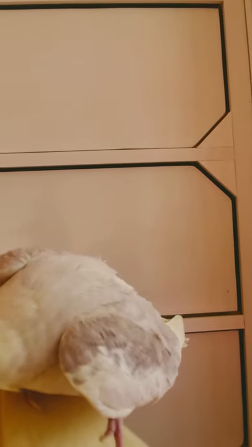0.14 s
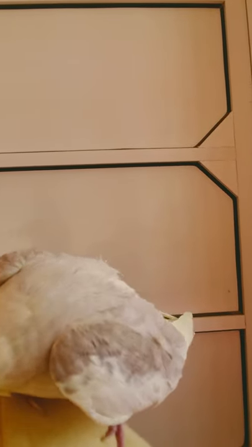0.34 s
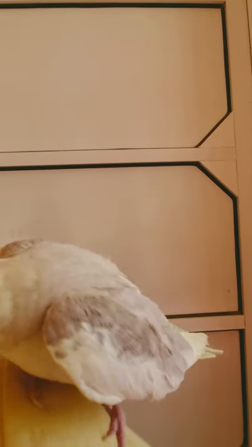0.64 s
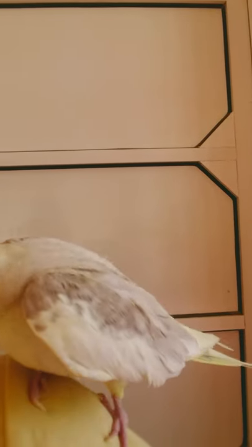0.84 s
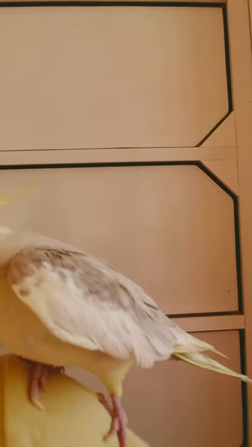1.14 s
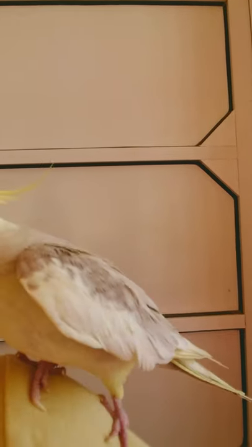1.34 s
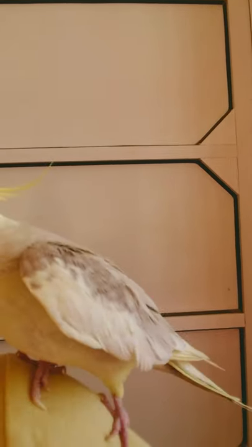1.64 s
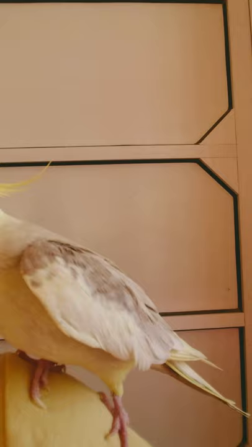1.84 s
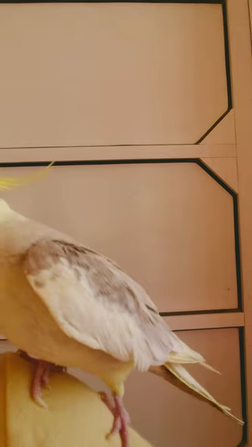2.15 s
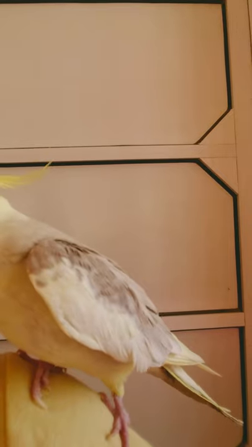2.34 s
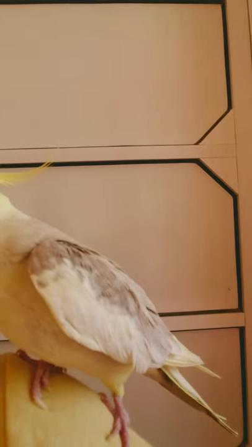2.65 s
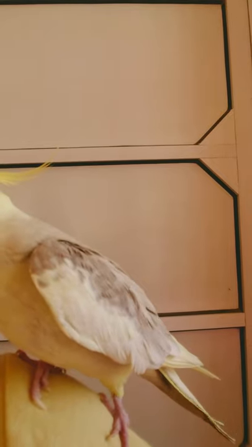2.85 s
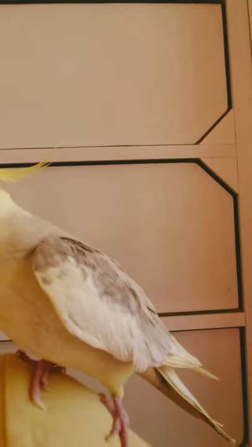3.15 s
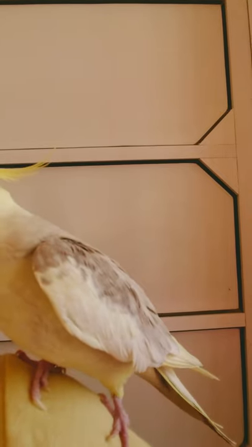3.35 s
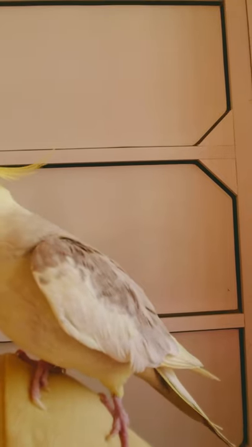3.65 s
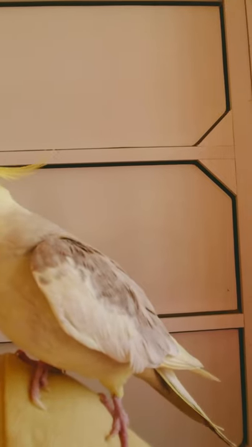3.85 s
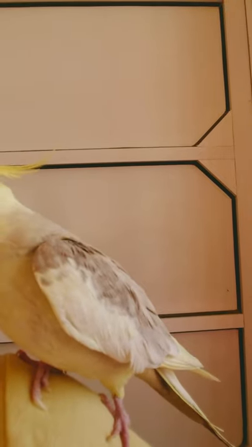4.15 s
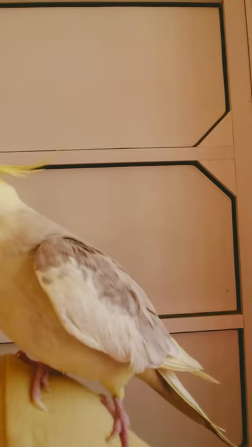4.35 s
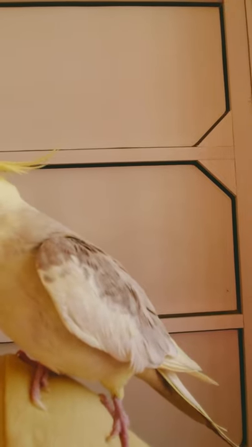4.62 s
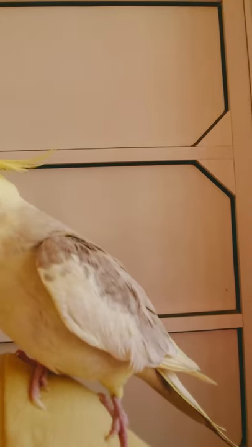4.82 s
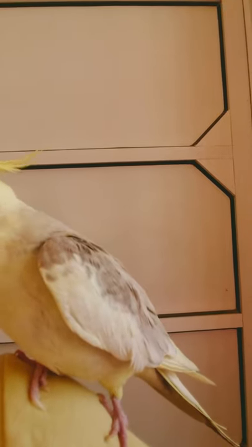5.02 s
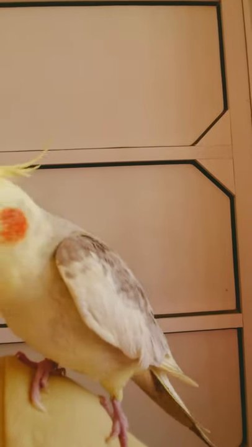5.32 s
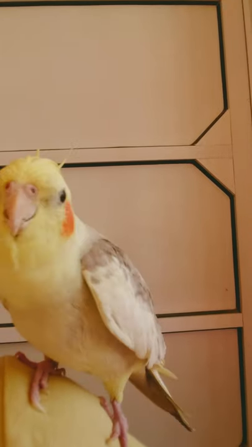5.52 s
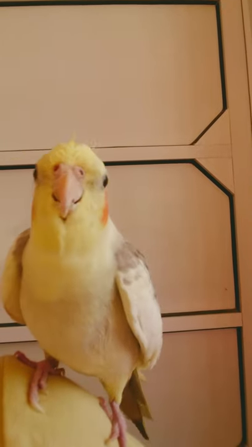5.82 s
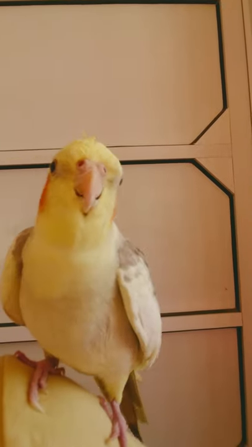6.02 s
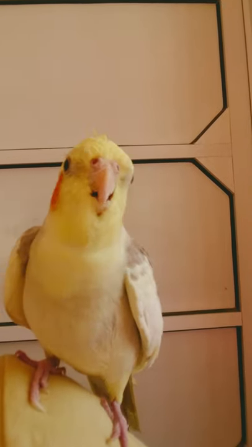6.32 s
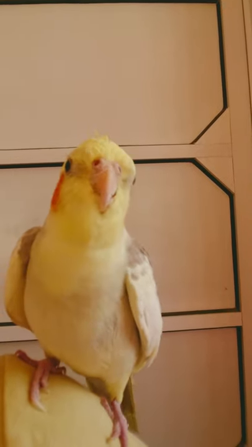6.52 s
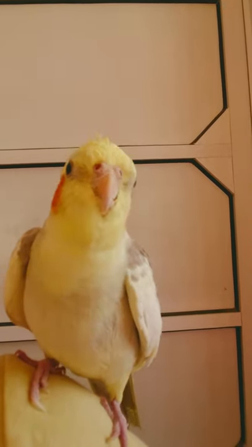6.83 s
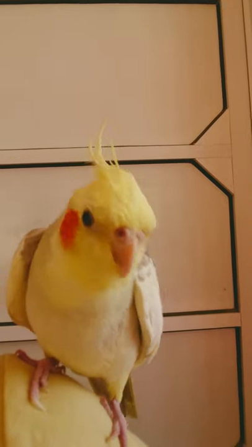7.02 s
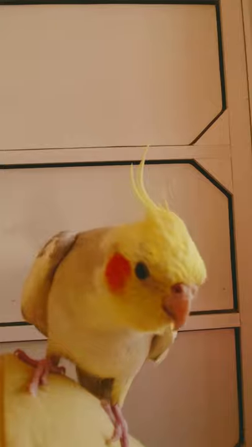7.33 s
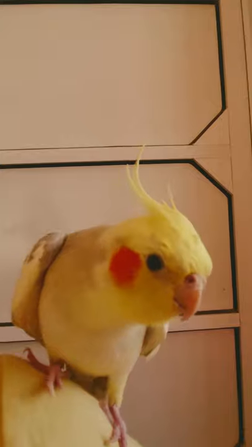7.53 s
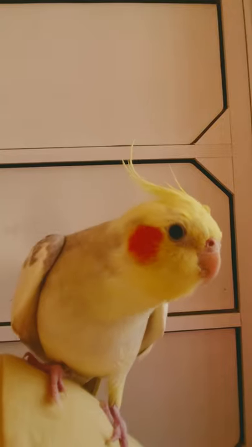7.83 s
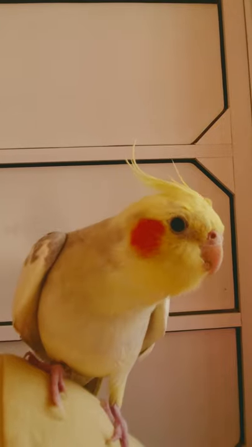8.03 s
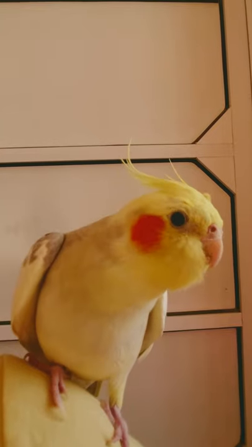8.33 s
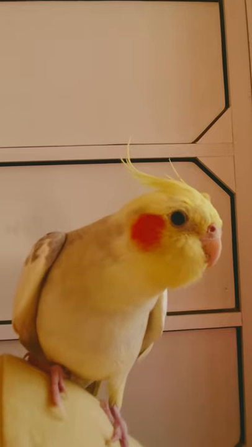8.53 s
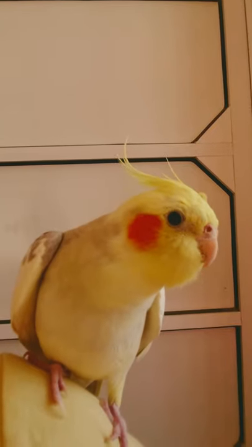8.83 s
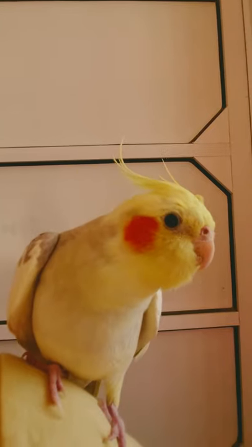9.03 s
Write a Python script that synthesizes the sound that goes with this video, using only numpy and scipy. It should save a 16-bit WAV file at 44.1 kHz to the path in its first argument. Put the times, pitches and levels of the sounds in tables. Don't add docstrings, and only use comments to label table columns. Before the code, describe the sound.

A cockatiel close by fires off a steady run of falling chirps, pauses, then gives sliding whistles, a loud shriek and paired calls over faint hum.

```python
import sys
import numpy as np
from scipy import signal
from scipy.fft import rfft, irfft, next_fast_len
from scipy.io import wavfile
from scipy.ndimage import uniform_filter1d, map_coordinates

SR = 44100
rng = np.random.default_rng(int(sys.argv[2]) if len(sys.argv) > 2 else 0)


def put_to_file(sound):
    columns = np.atleast_2d(sound).T
    safe = np.clip(columns, -1, 1)
    whole_steps = np.round(safe * 32767)
    wavfile.write(sys.argv[1], SR, whole_steps.astype(np.int16))


def elevation(decibels):
    levels = np.asarray(decibels, float)
    return 10 ** (levels / 20)


N = 404397


def curve(table, at, column=1):
    table = np.array(table, float)
    return np.interp(np.log(np.maximum(at, 1)), np.log(table[:, 0]), table[:, column])


def walk(rate_hz, size=N):
    span = int(SR / rate_hz)
    x = rng.standard_normal(size + 2 * span)
    x = uniform_filter1d(uniform_filter1d(x, span), span)[span:-span]
    return x / x.std()


def ring(x, hz, width_hz):
    return signal.lfilter(*signal.iirpeak(hz, hz / width_hz, SR), x)


def add(out, start_s, x):
    i = int(start_s * SR)
    out[i:i + len(x)] += x[:N - i]


def clock(length_s):
    return np.arange(0, length_s, 1 / SR)


def whistle(hz, db, second_db, third_db=-42, slope_db=-3.0, share=0.52, effort=0.1):
    size = len(hz)
    t = np.arange(size) / SR
    jitter, shimmer_db = 0.0035, 1.17
    phase = 2 * np.pi * np.cumsum(hz * (1 + jitter * walk(270, size))) / SR
    x = np.sin(phase) + elevation(second_db + 2.5 * walk(110, size)) * np.sin(2 * phase + 1)
    for k in range(3, 12):
        over_db = third_db + slope_db * (k - 3) + share * (second_db + 29) + effort * (db - db.max())
        level = elevation(over_db + 3.5 * walk(110, size)) * (k * hz < 17000)
        x = x + level * np.sin(k * phase + k * k + .045 * k * walk(900, size))
    x = x + elevation(-56.5) * np.sin(phase) * walk(2500, size)
    edge = np.clip(np.minimum(t / .003, (t[-1] - t) / .005), 0, 1)
    return np.sqrt(2) * x * elevation(db + shimmer_db * walk(120, size)) * np.sin(np.pi / 2 * edge) ** 2


def rasp(length_s, db, hz, width_hz, breath):
    size = int(length_s * SR)
    rate_hz, bright_db = 330, -27
    slaps = (rng.random(size) < rate_hz / SR) * elevation(1.7 * rng.standard_normal(size))
    slaps = slaps * np.sqrt(SR / rate_hz)
    swell = np.sin(np.pi * np.arange(size) / size) ** 0.55
    drive = np.pad((slaps + breath * rng.standard_normal(size)) * swell, (0, 200))
    throat = ring(ring(drive, hz, width_hz), hz, 1.5 * width_hz)
    x = throat + elevation(bright_db) * ring(ring(drive, 5300, 6000), 4900, 9000)
    x = signal.sosfilt(signal.butter(2, 3200, fs=SR, output="sos"), x)
    return x * elevation(db) / x.std()


# start_s, length_s, start_hz, bend (power of the fall), level_db
CHIRPS = [(1.104, .063, 2530, 5.0, -21.5), (1.265, 0.068, 2988, 3.0, -17.5), (1.424, 0.062, 2943, 3.0, -16),
          (1.575, 0.069, 3058, 4.0, -17.5), (1.747, 0.072, 3043, 3.1, -15.5),
          (1.925, .079, 2903, 3.8, -16.5), (2.102, 0.073, 2970, 2.8, -14.5),
          (2.28, 0.072, 2876, 3.5, -16.5), (2.458, 0.077, 2930, 4.0, -16), (2.631, 0.069, 2992, 3.2, -16),
          (2.803, 0.076, 2922, 3.6, -16), (2.985, 0.071, 3004, 3.7, -15.5), (3.168, .077, 3030, 3.4, -15),
          (3.359, 0.078, 3024, 3.0, -14.5), (3.538, 0.087, 2755, 3.5, -16.5),
          (3.724, 0.088, 2727, 4.5, -17), (3.935, 0.078, 2978, 5.1, -17)]
# time_s, pitch_hz
CHIRP_PLATEAU = [(1.1, 2779), (1.27, 2853), (1.6, 2916), (2.3, 2848), (3.2, 2908), (3.72, 2867),
                 (3.94, 2777)]


def chirps(out):
    settle_s, end_hz = .01, 1347
    for s, length, start_hz, bend, db in CHIRPS:
        t = np.arange(int(length * SR)) / SR
        fall = (t / length) ** bend
        top_hz = np.interp(s, *np.transpose(CHIRP_PLATEAU))
        hz = top_hz + (start_hz - top_hz) * np.exp(-t / settle_s) - (top_hz - end_hz) * fall
        swell_db = -3 * np.exp(-t / 0.014) - 9 * np.exp(-t / .0025) - 34 * fall ** 1.217
        add(out, s, whistle(hz, db + swell_db, -30 - 7 * fall, -35, -1.0, effort=0.36))
        add(out, s + length - .016, rasp(.016, db - 29, 1300, 1000, 0.6))


# third_db (below the first), slope_db per overtone,
# share that follows the second, share that follows effort
TONE = dict(low=(-31.5, -6.5, 0.18, .1), arch=(-34.5, -1.5, 0.5, 0.1), scoop=(-36.5, -1, 0.3, 0.24),
        drop=(-38, -3.5, 1.1, 0.44), slide=(-42.5, -2.8, 1.2, .2), shriek=(-36.5, -4.5, 0.46, -0.36))
# start_s, length_s, pitch_hz, level_db, beak_opening_db
LOWS = [
    (.955, .095, 1297, -37.5, -5),
    (4.165, 0.1034, 1293, -33.5, 3),
]


def lows():
    for s, length, hz, db, beak_db in LOWS:
        t = clock(length)
        settle = np.exp(-t / 0.0067)
        waver_hz = -22 * np.sin(2 * np.pi * 13 * t)
        yield s + t, hz + 80 * settle + waver_hz, db + 1 * settle, beak_db, TONE["low"]


# start_s, length_s, top_hz, top_at (share of the length), end_hz
ARCHES = [(5.565, .078, 1435, 0.83, 1390), (5.936, .065, 2259, .5, 2150), (6.073, .093, 1710, .52, 1245)]
ARCH_DB = [-31, -20, -21]


def arches():
    start_share = .91
    rise_db, fall_db = 89.5, 55.5
    for (s, length, top_hz, top_at, end_hz), db in zip(ARCHES, ARCH_DB):
        t = clock(length)
        way = t / length - top_at
        rise = np.sin(np.pi / 2 * np.minimum(way, 0) / top_at) ** 2
        fall = (np.maximum(way, 0) / (1 - top_at)) ** 1.6
        hz = top_hz * (1 - (1 - start_share) * rise) - (top_hz - end_hz) * fall
        push_db = np.where(way < 0, rise_db, fall_db) * np.log(hz / top_hz)
        yield s + t, hz, db + push_db, -5, TONE["arch"]


# start_s, length_s, top_hz, level_db, sag_db per s after the top
SCOOPS = [(7.321, .073, 2640, -20, 330), (7.694, .065, 2578, -16, 30), (8.081, .069, 2634, -16, 40.5)]


def scoops():
    from_hz, rise_s, arch_hz, soft_db, fade_s = 1430, .031, 130, -29, 0.0096
    for s, length, top_hz, db, sag_db in SCOOPS:
        t = clock(length)
        rise = np.minimum(t / rise_s, 1)
        fade = np.maximum(1 - (length - t) / fade_s, 0)
        hz = from_hz + (top_hz - from_hz) * np.sin(np.pi / 2 * rise ** 1.6) ** 2
        hz = hz - arch_hz * ((t - .048) / .022) ** 2 * (rise == 1)
        swell_db = soft_db * (1 - np.minimum(t / .045, 1)) ** 1.7
        level_db = db + swell_db - 18 * fade - sag_db * np.maximum(t - .042, 0)
        yield s + t, hz, level_db, -2.5, TONE["scoop"]


# start_s, length_s, start_hz, end_hz, level_db
DROPS = [(7.451, .033, 2272, 2010, -34.5), (7.83, 0.035, 2198, 1952, -32), (8.221, .034, 2231, 2016, -30)]


def drops():
    for s, length, start_hz, end_hz, db in DROPS:
        t = clock(length)
        way = t / length
        hz = start_hz + (end_hz - start_hz) * way ** 1.5
        yield s + t, hz, db - 4 * (1 - way) ** 3, -2.5, TONE["drop"]


# time_s, pitch_hz, level_db
SLIDES = [
    [(5.18, 2330, -44.5), (5.214, 1839, -38.5), (5.236, 2104, -30), (5.258, 2148, -22.5),
     (5.272, 2030, -29.5), (5.283, 1420, -35.5), (5.292, 1400, -42.5)],
    [(5.298, 2113, -45), (5.307, 2340, -29.5), (5.322, 2799, -20), (5.358, 3020, -19), (5.372, 3266, -14),
     (5.392, 3356, -17.5)],
    [(5.694, 2123, -30), (5.701, 2088, -18.5), (5.708, 2570, -15.5), (5.722, 2698, -15.5),
     (5.762, 2761, -24), (5.79, 3035, -15), (5.817, 2874, -20)],
]
# time_s, pitch_hz, level_db, beak_opening_db (on the second overtone)
SHRIEK = [(6.293, 1367, -34, 9), (6.33, 1539, -27.5, 15.5), (6.352, 1829, -19.5, 25),
          (6.378, 2134, -19.5, 19.5), (6.394, 2707, -13.5, 3.5), (6.41, 3041, -13, 0), (6.45, 2882, -11, 0),
          (6.476, 2450, -24.5, -0.5), (6.489, 1523, -37, -9)]


def slides():
    for rows, tone in [(slide, "slide") for slide in SLIDES] + [(SHRIEK, "shriek")]:
        s, hz, db, *beak_db = np.transpose(rows)
        t = np.arange(s[0], s[-1], 1 / SR)
        smooth = lambda c: uniform_filter1d(np.interp(t, s, c), size=200, mode="nearest")
        yield t, smooth(hz), smooth(db), sum(smooth(c) for c in beak_db), TONE[tone]


# start_s, end_s, rate_hz, depth_hz, slip_db (dip at each slip)
WARBLE = (6.322, 6.401, 78.5, 190, 9)
# width_s, drop (share of pitch), dip_db
BREAK = (.0022, .05, 5)
# pitch_hz, level_db (below the first)
SECOND = [(1300, -13), (1700, -16), (2100, -22), (2600, -26), (3300, -32)]


def note_voice(t, hz, db, beak_db, tone):
    start, end, rate_hz, depth_hz, slip_db = WARBLE
    shake = np.clip((t - start) / (end - start), 0, 1) * np.clip((end - t) / 0.0052, 0, 1)
    turn = 2 * np.pi * rate_hz * (t - start)
    sway = -np.cos(turn - np.pi / 4) - .35 * np.sin(2 * turn)
    width, drop, dip_db = BREAK
    gap = sum(np.exp(-((t - tick[0]) / width) ** 2) for tick in TICKS)
    level_db = db - slip_db * shake * np.maximum(np.cos(turn), 0) - dip_db * gap
    pitch_hz = (hz + depth_hz * shake * sway) * (1 - drop * gap)
    return whistle(pitch_hz, level_db, curve(SECOND, hz) + beak_db, *tone)


# (throat_hz, throat_width_hz, breath against slaps),
# then rows of start_s, length_s, level_db
RASPS = [
    ((1040, 1100, 3.0), [(.955, .03, -61), (4.169, 0.11, -56.5), (5.277, 0.01343, -49.5), (5.563, 0.016, -50.5), (5.632, .022, -50.5), (5.936, 0.0093, -56.5), (6.077, .02, -49), (6.299, .017, -55.5)]),
    ((1390, 880, 1.6), [(3.6, .03, -42), (3.8, .029, -42.5), (5.181, .03, -47)]),
    ((2340, 470, 4.0), [(5.179, .018, -48.5), (5.192, 0.013, -49.5)]),
    ((1590, 1320, 1.5), [(7.323, 0.03, -46), (7.691, .023, -39.5), (8.083, 0.021, -39)]),
    ((1600, 1120, 1), [(7.477, 0.049, -46.5), (7.858, .05, -40.5), (8.248, .07, -38)]),
]


def rasps(out):
    for throat, rows in RASPS:
        for s, length, db in rows:
            add(out, s, rasp(length, db, *throat))


# start_s, peak_db, ring_hz
TICKS = [(1.724, -44, 3700), (1.874, -51.5, 4040), (2.062, -52, 5000), (3.338, -47.5, 5500),
         (4.722, -55.5, 4440), (4.809, -57, 2300), (5.311, -43.5, 1202), (5.334, -43.5, 4100),
         (5.357, -38, 1490), (5.388, -33, 1605), (5.567, -44, 900), (5.643, -48, 1504),
         (5.734, -36.5, 1489), (5.757, -46.5, 1530), (5.781, -33.5, 1510), (5.81, -39.5, 1560),
         (5.938, -38.5, 1300), (6.001, -48.5, 1318), (6.076, -37.5, 1000), (6.167, -33, 1200),
         (6.473, -29, 1416), (7.314, -38.5, 1580), (7.39, -36, 1325), (7.684, -34.5, 1460),
         (7.76, -31, 1324), (8.075, -35, 1760), (8.151, -30, 1427), (9.035, -55, 399)]


def ticks(out):
    for s, db, hz in TICKS:
        age = np.arange(260)
        snap = rng.standard_normal(len(age)) * np.exp(-age / 40) * np.minimum(age / 12, 1)
        tick = ring(ring(snap, hz, .8 * hz), hz, 1.7 * hz) + .012 * ring(snap, 4500, 2000)
        add(out, s, elevation(db) * tick / np.abs(tick).max())


def bird():
    out = np.zeros(N)
    chirps(out)
    for kind in (lows, arches, scoops, drops, slides):
        for note in kind():
            add(out, note[0][0], note_voice(*note))
    rasps(out)
    ticks(out)
    return out


# delay_ms, level_db
ECHOES = [
    [(1.5, -23.5), (4, -20), (8.8, -10.5), (11.2, -16.5), (22, -16)],
    [(1.5, -21.5), (3.9, -19.5), (16, -15.5), (22.8, -16.5), (28, -19)],
]
# centre_hz, t60_s
ROOM = [(500, .8), (1400, 0.53), (2800, 0.51), (6000, 0.42), (12000, 0.22)]


def walls():
    t = np.arange(int(.9 * SR)) / SR
    edges_hz = [100, 900, 2000, 4100, 8500, 20000]
    tail = 0
    for (_, t60), lo, hi in zip(ROOM, edges_hz, edges_hz[1:]):
        sos = signal.butter(2, [lo, hi], "band", fs=SR, output="sos")
        tail = tail + signal.sosfilt(sos, rng.standard_normal((2, len(t)))) * elevation(-60 * t / t60)
    tail = tail * np.clip((t - .004) / 0.022, 0, 1) * elevation(-13) / np.sqrt(0.024 * SR)
    for ear, echoes in zip(tail, ECHOES):
        for ms, db in echoes:
            ear[int(ms * SR / 1000)] += elevation(db)
    return tail


# time_s, lag_ms (right behind left), pan_db (left minus right), facing (the phone, 0-1)
HEAD = [(.95, .04, -4.5, .05), (4.1, .076, -2.5, .05), (5.25, .11, -1.5, 0.5), (5.649, .21, -1, .8),
        (5.85, .17, 0.1, 1), (6.148, 0.19, -2, .9), (6.451, .16, -0.5, 0.4), (7.299, 0.11, -5, .9),
        (8.301, .13, -3.5, 0.8)]


def beam(voice):
    t = np.arange(N) / SR
    s, *columns = np.transpose(HEAD)
    lag_ms, pan_db, facing = (np.interp(t, s, c) for c in columns)
    treble = signal.sosfiltfilt(signal.butter(3, 12300, "high", fs=SR, output="sos"), voice)
    voice = voice + (elevation(9 * facing) - 1) * treble
    lean_hz, lean_width_hz, lean_db = 2610, 610, 7
    band = signal.filtfilt(*signal.iirpeak(lean_hz, lean_hz / lean_width_hz, SR), voice)
    left = voice + (elevation(lean_db * facing / 2) - 1) * band
    right = voice + (elevation(-lean_db * facing / 2) - 1) * band
    late = map_coordinates(right, [np.arange(N) - lag_ms * SR / 1000], order=3)
    direct = np.array([left * elevation(pan_db / 2), late / elevation(pan_db / 2)])
    return direct, voice * elevation(-3.5 * facing)


# freq_hz, left_db, right_db
COLOUR = [(490, 1.5, 2.5), (3350, 2, -1), (4173, 4, 4), (6100, -4, 2), (8900, -13.5, -3), (9540, -29, -22),
          (10100, -27, -16.5), (11050, -18.5, -3), (12800, -3, -6), (14710, -9, -11), (15600, 2.5, -6.5)]


def microphones(heard):
    size = next_fast_len(N)
    hz = np.fft.rfftfreq(size, 1 / SR)
    colour = elevation(np.array([curve(COLOUR, hz, column=1), curve(COLOUR, hz, column=2)]))
    return irfft(rfft(heard, size) * colour, size)[:, :N]


# freq_hz, level_db
HUM = [(80.7, -75), (109.5, -69), (119.9, -61), (240.1, -60.5), (360, -75.5), (480, -74.5), (4059, -94.5),
       (4118, -92), (4177, -93.5)]
# freq_hz, density_db (per Hz)
HISS = [(15, -46.5), (35, -32), (65, -15.5), (110, -10), (144, -15), (260, -20.5), (392, -29), (500, -24.5),
        (640, -28.5), (1000, -39.5), (2000, -42.5), (7000, -49.5), (12600, -55.5), (13600, -72.5),
        (15800, -80)]
# freq_hz, likeness (0-1)
LIKENESS = [(60, 0.8), (130, 1), (290, 0.8), (640, 0.3), (1410, 0), (3100, 0.08), (6820, 0.2), (15000, 0.3)]
# freq_hz, lean_db (left minus right)
LEAN = [(60, 1.5), (250, -3.5), (700, -2), (1500, -1), (4400, 1)]


def background():
    hz = np.fft.rfftfreq(N, 1 / SR)
    like = np.clip(curve(LIKENESS, hz), 0, 1)
    noise = rfft(rng.standard_normal((2, N))) * elevation(curve(HISS, hz))
    mid, side = noise * np.sqrt([1 + like, 1 - like])
    lean = elevation(curve(LEAN, hz) / 2)
    hiss = irfft(np.array([(mid + side) * lean, (mid - side) / lean]), N)
    out = hiss * elevation(-59) / hiss.std()
    t = np.arange(N) / SR
    for f, db in HUM:
        line = np.sin(2 * np.pi * (f * t + .04 * walk(4.9)))
        line = line * np.sqrt(2) * elevation(db + 0.88 * walk(15))
        out += line * elevation(curve(LEAN, f) * np.array([[.5], [-.5]]))
    return out


def scene():
    direct, to_walls = beam(bird())
    echoed = signal.fftconvolve(to_walls[None], walls(), axes=1)[:, :N]
    return microphones(direct + echoed) + background()


def band_limit(x):
    return signal.sosfilt(signal.butter(12, 15950, fs=SR, output="sos"), x)


def record(dry):
    return band_limit(dry - .0007)


dry = scene()
out = record(dry)
put_to_file(out)
```